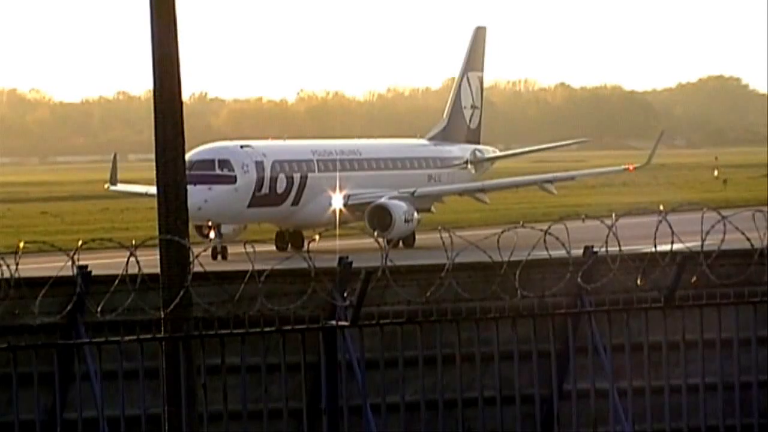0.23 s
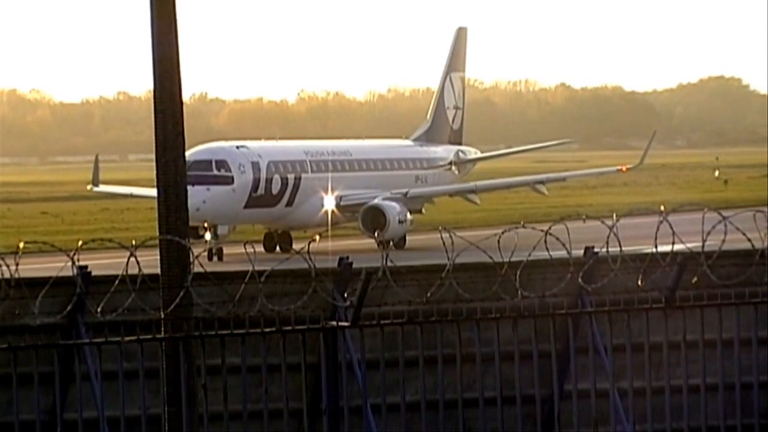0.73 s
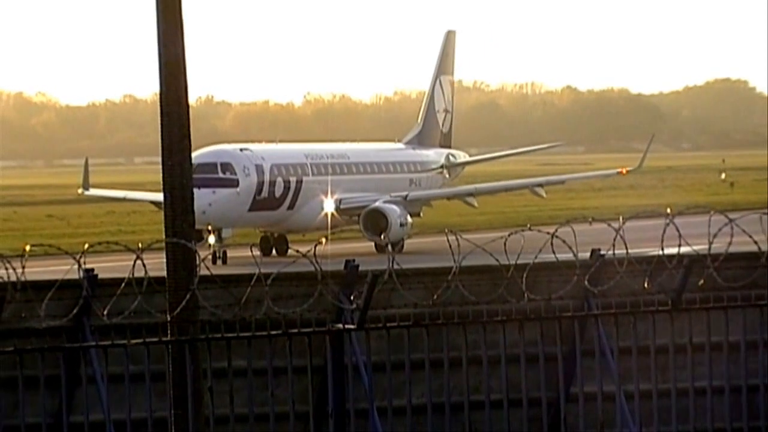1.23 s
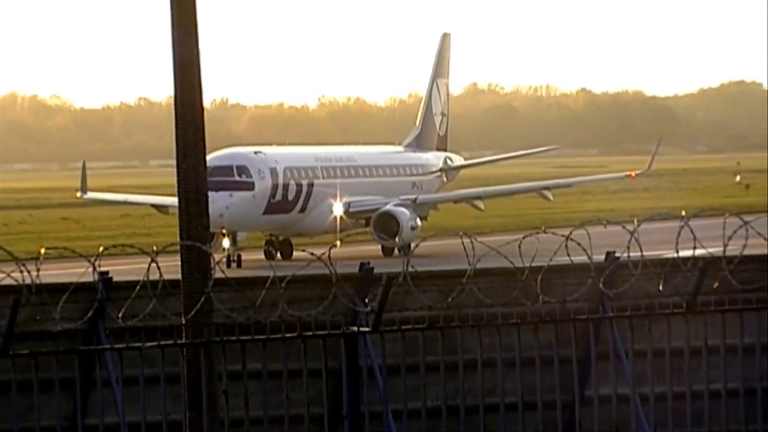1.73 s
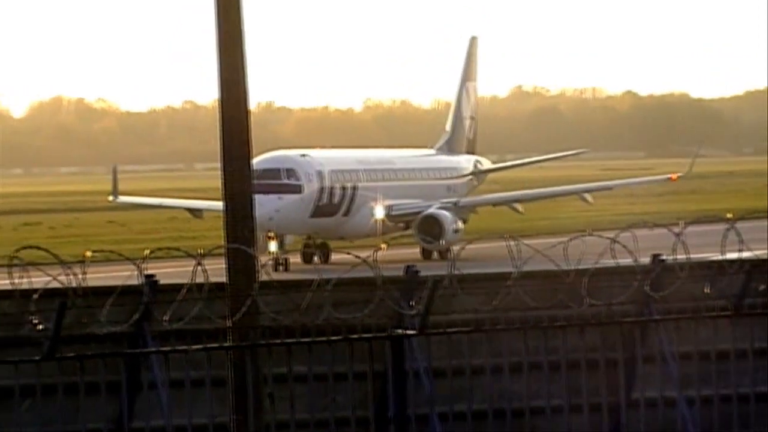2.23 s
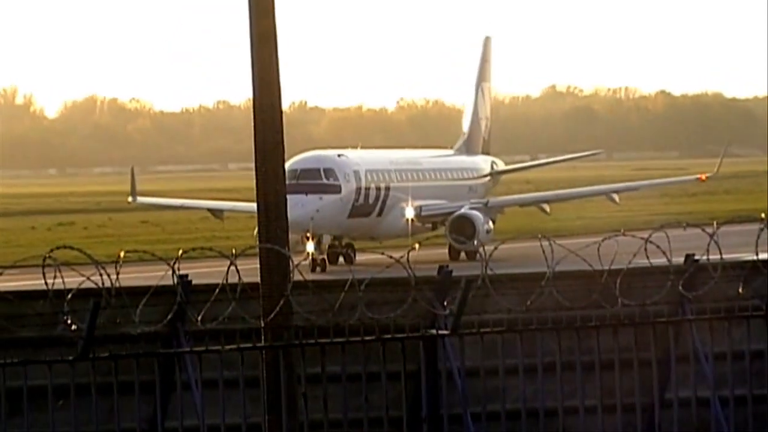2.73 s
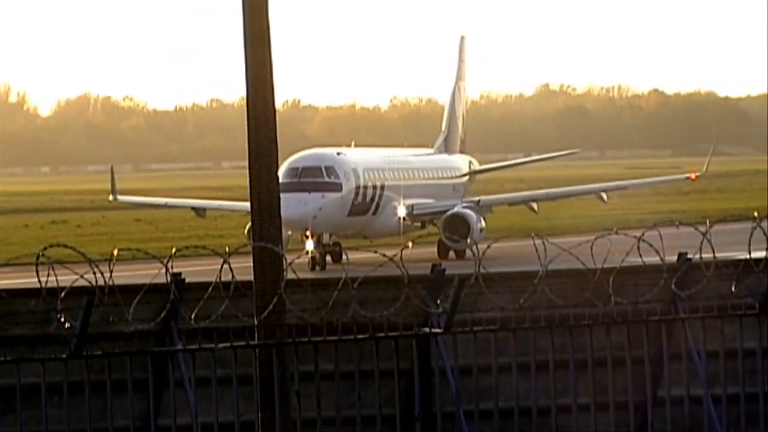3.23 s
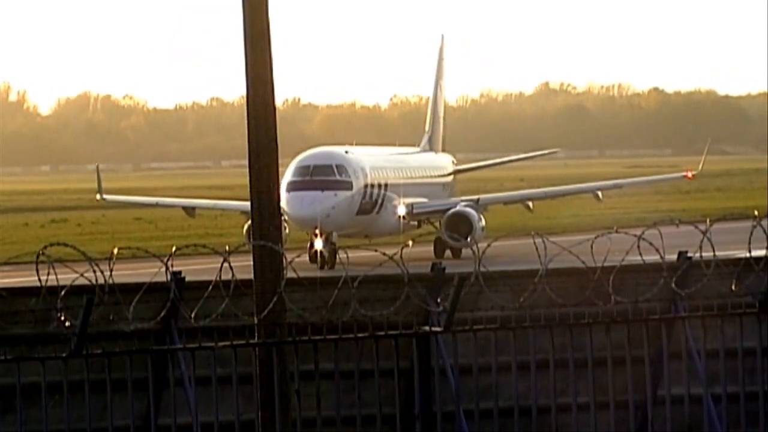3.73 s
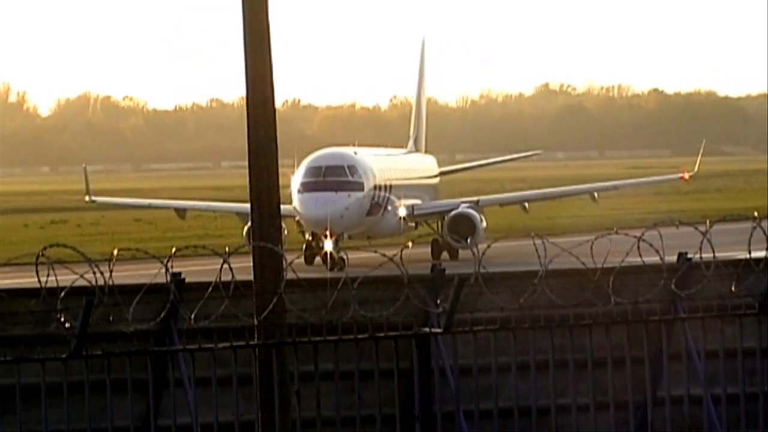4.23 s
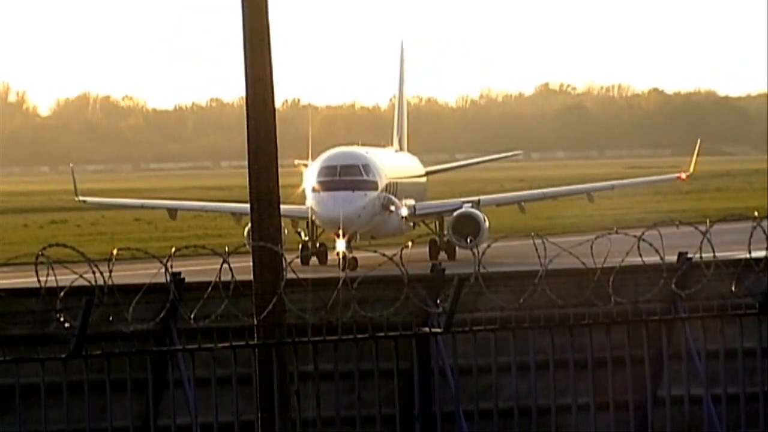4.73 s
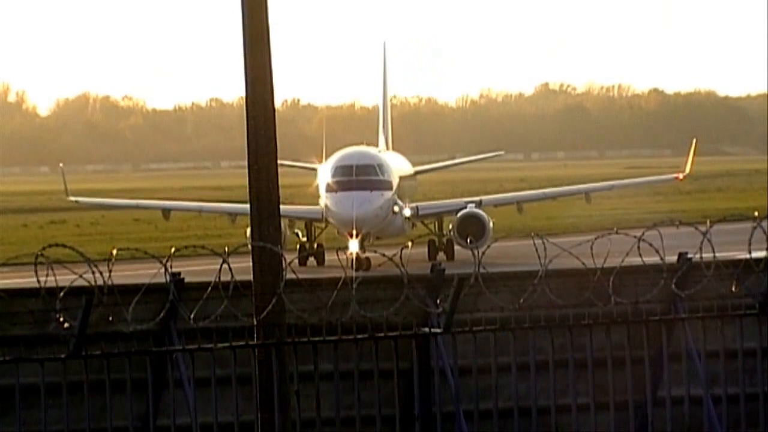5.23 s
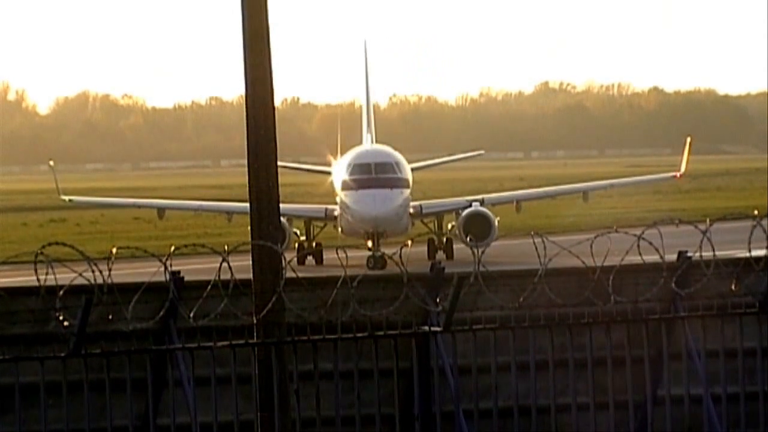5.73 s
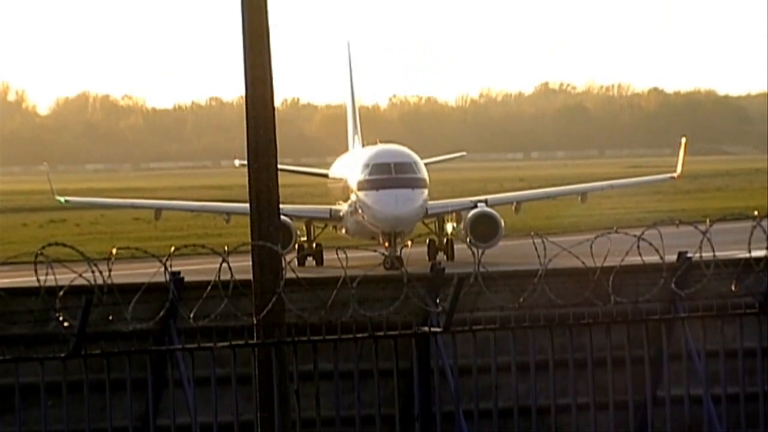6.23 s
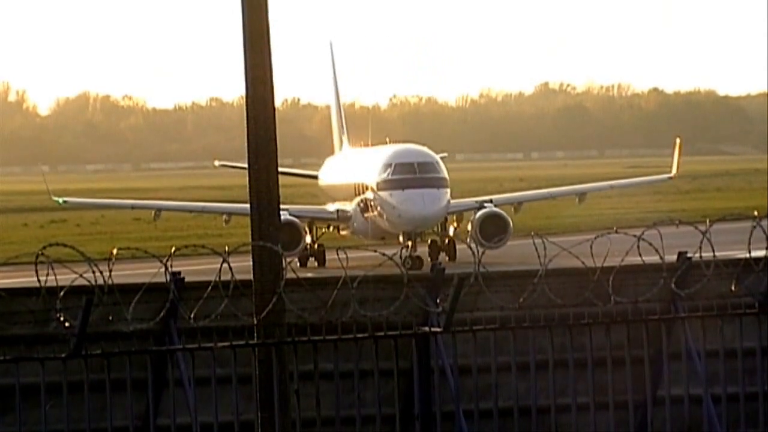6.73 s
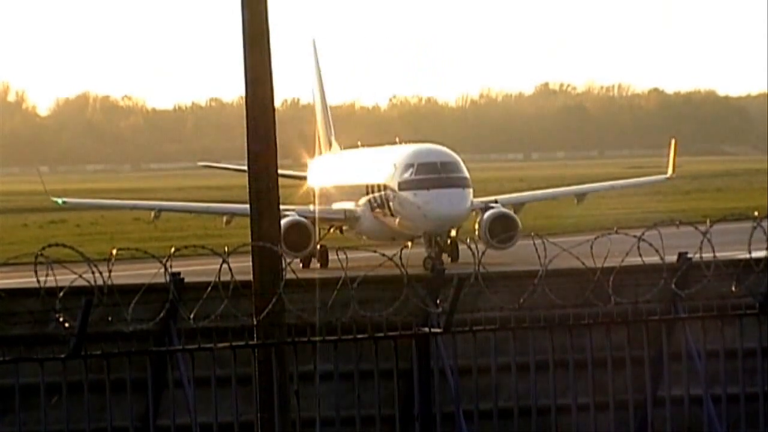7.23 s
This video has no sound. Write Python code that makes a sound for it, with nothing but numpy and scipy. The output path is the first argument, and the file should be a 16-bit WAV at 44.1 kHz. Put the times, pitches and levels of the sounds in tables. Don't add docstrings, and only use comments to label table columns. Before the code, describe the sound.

Twin jet engines of an airliner turning on a taxiway whistle and whine steadily over a broad rushing hiss, swelling and flickering in gusty air.

```python
import sys
import numpy as np
from scipy import signal
from scipy.fft import rfft, irfft
from scipy.io import wavfile

SR = 44100
rng = np.random.default_rng(int(sys.argv[2]) if len(sys.argv) > 2 else 0)


def dump(signal):
    limited = np.clip(np.atleast_2d(signal).T, -1, 1)
    pcm = np.round(limited * 32767).astype(np.int16)
    wavfile.write(sys.argv[1], SR, pcm)


def linear_from_db(decibels):
    return 10 ** (np.asarray(decibels, float) / 20)


N = 330750
TIME = np.arange(N) / SR


def in_time(rows):
    seconds, level_db = np.transpose(rows)
    return np.interp(TIME, seconds, level_db)


def swing(rows):
    db = in_time(rows)
    return db - db.mean()


def lobes(rows):
    return sum(db * np.exp(-0.5 * ((TIME - s) / length * 2) ** 2) for s, length, db in rows)


def at_hz(points, hz):
    table = np.array(points)
    return np.interp(np.log(hz + 1), np.log(table[:, 0] + 1), table[:, 1])


def drift(rate):
    step = 20
    r = np.exp(-2 * np.pi * rate * step / SR)
    white = rng.standard_normal(N // step + 4002)
    slow = signal.lfilter([1], [1, -2 * r, r * r], white)[4000:]
    return np.interp(np.arange(N) / step, np.arange(len(slow)), slow / slow.std())


def tone(hz, db, waver_hz, twinkle_db, rate):
    wavering_hz = hz + waver_hz * drift(rate)
    phase = 2 * np.pi * (np.cumsum(wavering_hz) / SR + rng.random())
    level = np.sqrt(2) * linear_from_db(db + twinkle_db * drift(rate))
    return level * np.sin(phase)


WHISTLE_HZ = [631, 646.7]
# t/s, level/dB
FIRST_WHISTLE = [(0, -31), (.2, -28.5), (.6, -31), (.85, -28.5), (1.45, -24.5), (2.1, -28.5), (2.55, -32),
                 (3.2, -25.5), (3.7, -23), (4.1, -24.5), (4.45, -26), (4.8, -25), (5.3, -23), (6.55, -22),
                 (6.75, -32.5), (6.87, -24), (7.5, -21)]
SECOND_WHISTLE = [(0, -27.5), (.35, -30.5), (.9, -32), (1.55, -37), (2.35, -43), (2.85, -31), (3.65, -36),
                  (4.25, -37), (5.05, -35.5), (5.3, -27.5), (5.7, -34), (6.1, -27.5), (6.45, -29),
                  (6.65, -36), (6.85, -30), (7.05, -31), (7.5, -34)]
# (t/s, length/s, level above silence/dB)
STRAYS = [
    (611, 4, [(6.3, 0.25, 25), (7.05, 0.44, 32)]),
    (1413, 25, [(7.25, .5, 31)]),
    (2880, 5.98, [(3.5, 12, 16.5)]),
]


def whistles():
    sharp_hz = 5.97 * np.exp(-TIME / 0.2003)
    out = tone(WHISTLE_HZ[0] + sharp_hz, in_time(FIRST_WHISTLE), waver_hz=1.0, twinkle_db=1.5, rate=9.1)
    out += tone(WHISTLE_HZ[1], in_time(SECOND_WHISTLE), waver_hz=1.5, twinkle_db=1.3, rate=9.1)
    for hz, waver_hz, rows in STRAYS:
        out += tone(hz, lobes(rows) - 60, waver_hz, twinkle_db=4.0, rate=11.7)
    return out


# f/Hz, level/dB
FAN_HZ = [(862.2, -1), (853, -6)]
# level/dB, share of the gust, share of the beam
FAN_PARTS = [(-38.5, .4, 0.97), (-34, 1.25, 0.1), (-42, 0.82, -0.46), (-43, .5, 0.21)]
# t/s, length/s, level/dB
GUST = [(.02, 0.17, 7), (.42, 0.13, 7), (.75, 0.36, 6.5), (1.45, 0.098, 7.5), (2.02, 0.17, 6.5),
        (2.95, 0.29, 5), (3.6, .2, 3), (4.1, 0.27, 5), (4.87, .15, 7), (5.27, 0.23, 7), (5.8, 0.35, 0.5),
        (6.17, 0.3, 7.5), (6.65, .35, 6.5), (7.0, 0.25, 1.5)]
# t/s, level/dB
BEAM = [(0.0, -28), (0.1, -26), (0.5, -28), (0.6, -26.5), (1.81, -26.5), (1.84, -24.5), (2.34, -26),
        (2.4, -23.5), (3.46, -26.5), (3.65, -25), (3.89, -29), (3.95, -26), (5.49, -28.5), (5.56, -27.5),
        (5.95, -29), (7.31, -29), (7.42, -31), (7.5, -28.5)]


def fans():
    gust, beam = lobes(GUST), swing(BEAM)
    out = 0
    for k, (db, gust_share, beam_share) in enumerate(FAN_PARTS, 1):
        part_db = db + gust_share * gust + beam_share * beam - 2.5
        for hz, engine_db in FAN_HZ:
            out = out + tone(hz * k, part_db + engine_db, waver_hz=3.5 * k, twinkle_db=1.9, rate=13.97)
    return out


BOOSTER_HZ = [2771.5, 2749.5, 5544.5]
# level/dB, share of the beam, share of the lobes
BOOSTER_PARTS = [(-37.5, .3, 0.97), (-40, .3, 0.78), (-44, 0.69, .1)]
# t/s, length/s, level/dB
BOOSTER_LOBES = [(.15, .2, 6.5), (1.42, 0.1, 8), (2.05, 0.27, 5), (2.46, .4, 10), (3.0, .5, 2),
                 (4.05, .3, 4), (5.2, .4, 4), (6.83, 0.14, 6), (7.25, 0.29, 8)]


def boosters():
    beam, lobe = swing(BEAM), lobes(BOOSTER_LOBES)
    out = 0
    for hz, (db, beam_share, lobe_share) in zip(BOOSTER_HZ, BOOSTER_PARTS):
        line_db = db + beam_share * beam + lobe_share * lobe - 3.0
        out = out + tone(hz, line_db, waver_hz=2.83, twinkle_db=1.5, rate=12.1)
    return out


# near engine f/Hz, far engine f/Hz
SCATTER_HZ = [(6406, 6391), (7267.5, 7248.6), (8129, 8106)]
# level/dB, share of the beam
SCATTER_PARTS = [(-49.5, 0.82), (-55, 1.2), (-54.5, 1.6)]
# t/s, length/s, level/dB
SCATTER_LOBES = [
    [(.85, .2, 7), (3.2, .4, 8), (5.3, .4, 7), (6.9, .3, 8), (7.25, .25, 5)],
    [(2.05, .3, 7), (2.75, .6, 9), (4.15, 0.29, 3), (6.2, .3, 10)],
    [(1.8, .5, 8), (3.0, .4, 6), (4.58, .35, 7), (5.55, .2, 3)],
]
# f/Hz, level/dB
FAINT = [(8992, -63), (10318, -74.5), (10574, -73), (11062, -76), (12324, -72), (13347, -69), (14208, -73),
         (14464, -76), (14975, -74)]


def scattered_lines():
    beam = swing(BEAM)
    out = 0
    for (near_hz, far_hz), (db, beam_share), rows in zip(SCATTER_HZ, SCATTER_PARTS, SCATTER_LOBES):
        near_db = db + beam_share * beam + lobes(rows) - 3.0
        out = out + tone(near_hz, near_db, waver_hz=3.03, twinkle_db=1.0, rate=12.3)
        out = out + tone(far_hz, db - 12.0, waver_hz=3.6, twinkle_db=3.0, rate=3.96)
    for hz, db in FAINT:
        out = out + tone(hz, db + beam, waver_hz=4.07, twinkle_db=0.0, rate=3.0)
    return out


# f/Hz, level per Hz/dB
COLOUR = [(25, -25.5), (170, -25), (300, -12.5), (360, -14.5), (480, -4), (900, -4.5), (1800, 0),
          (2600, -6), (3300, -9.5), (4500, -9), (6300, -16), (7800, -25), (11500, -37), (15800, -36)]
# f/Hz, width/Hz, level side on/dB, half turned/dB, nose on/dB
HUMPS = [(596, 110, 1.5, -2, -0.5), (708, 33, -7.5, -5, -1.5), (860, 140, 5.5, 3, 2),
         (950, 28, 2.5, -3.5, -7.5), (1100, 270, -1.5, -4, -1.5), (1254, 84, 4.5, 4, 1),
         (1460, 73, 2, 1.5, 2.5), (1565, 116, 1, 1, -8.5), (1720, 99, 1.5, 1, 3.5),
         (1830, 69, -2, 0.5, -0.5), (2013, 63, 3.5, 2.5, 7), (2153, 88, 1, 2.5, 5), (2370, 104, 3.5, 5, 1),
         (2480, 80, 1, 2.5, 0), (2510, 45, -3, -9, 0), (2625, 75, -2, -0.5, 5.5), (2850, 66, -2, -3.5, 2.5),
         (3520, 120, -0.5, -1, 3), (3870, 230, 0.5, -0.5, -1), (4090, 80, 2, -3, -1),
         (4540, 250, 1.5, -1, -2), (5200, 200, 2, 2, -3), (9660, 980, 2, 2, 3.5), (13500, 1500, 3, 2, 4.5)]
TURN_S = [1.2, 3.7, 5.56]


def coloured_rush(hz):
    white = rfft(rng.standard_normal((2, N)))
    coloured = white * linear_from_db(at_hz(COLOUR, hz) - 52.0) * np.sqrt(SR / 2)
    noise = 0
    for k in range(3):
        humps_db = sum(row[2 + k] * np.exp(-0.5 * ((hz - row[0]) / row[1] * 2) ** 2) for row in HUMPS)
        share = np.interp(TIME, TURN_S, np.arange(3) == k)
        noise = noise + share * irfft(coloured * linear_from_db(humps_db), N)
    return noise


RUSH_HZ = [350, 1500, 4300, 11000]
RUSH_FOLLOWS = [(-.1, 0.046), (0.16, .15), (1, .01), (0.46, .01)]
# f/Hz, level/dB
FLICKER = [(300, 0.6), (2000, 0), (6000, 1.0), (12000, 0.4)]


def rush(hz):
    noise = rfft(coloured_rush(hz))
    swell = np.array(RUSH_FOLLOWS) @ np.array([swing(BEAM), lobes(GUST)])
    together = 0.15 * drift(15.0) + 0.79 * drift(31.0)
    centres = np.geomspace(120, 15000, 15)
    out = 0
    for k, centre in enumerate(centres):
        band = np.interp(np.log(hz + 1), np.log(centres), np.arange(len(centres)) == k)
        weights = [np.interp(np.log(centre), np.log(RUSH_HZ), np.arange(4) == j) for j in range(4)]
        flicker_db = at_hz(FLICKER, centre) * together + 0.28 * drift(5.4)
        out = out + linear_from_db(weights @ swell + flicker_db) * irfft(noise * band, N)
    return out


def grit(x):
    middle_band = signal.butter(2, [1100, 7000], "band", fs=SR, output="sos")
    treble = signal.butter(4, 7000, "high", fs=SR, output="sos")
    middle = signal.sosfilt(middle_band, x)
    spill = signal.sosfilt(treble, middle ** 3)
    spill = signal.lfilter([1, -1.6, 0.7], [1], spill)
    return linear_from_db(-48) * spill / spill.std()


# f/Hz, likeness
LIKENESS = [(60, 0.92), (130, 0.86), (290, 0.99), (640, 0.97), (1410, 1), (3100, 0.94), (8000, 0.96),
            (15000, 0.92)]
# f/Hz, level/dB
LEFT_DB = [(30, -1), (110, -4.5), (200, -3), (380, -2.5), (700, -2.5), (1290, -2), (2380, -1.5),
           (4400, -3.5), (8120, -2), (15000, -0.5)]
# f/Hz, phase/radians
LEAD = [(0, 0), (3010, -0.25), (4130, -0.065), (15300, 0.0)]


def two_ports(common, apart, hz):
    common = rfft(common)
    alike = np.clip(at_hz(LIKENESS, hz), 0, 1)
    side = np.sqrt((1 - alike) / (1 + alike)) * rfft(apart)
    tilt = linear_from_db(at_hz(LEFT_DB, hz) / 2) * np.exp(0.5j * at_hz(LEAD, hz))
    left, right = (common + side) * tilt, (common - side) / tilt
    return irfft(np.array([left, right]), N)


def scene():
    hz = np.arange(N // 2 + 1) * SR / N
    common, apart = rush(hz)
    common = common + whistles() + fans() + boosters() + scattered_lines()
    return two_ports(common + grit(common), apart, hz)


def roll_off(x):
    return signal.sosfilt(signal.butter(12, 15790, fs=SR, output="sos"), x)


def record(dry):
    return roll_off(dry)


dry = scene()
out = record(dry)
dump(out)
```